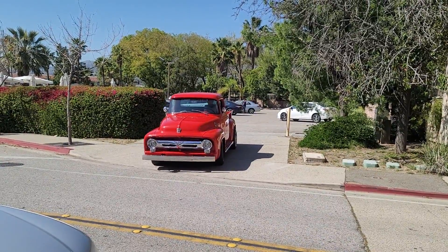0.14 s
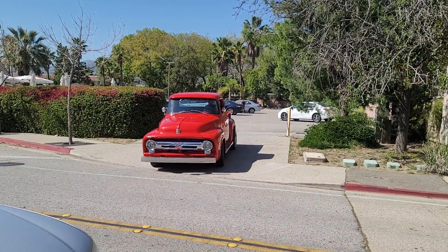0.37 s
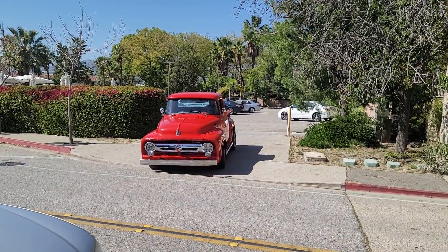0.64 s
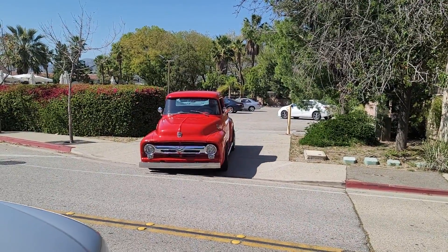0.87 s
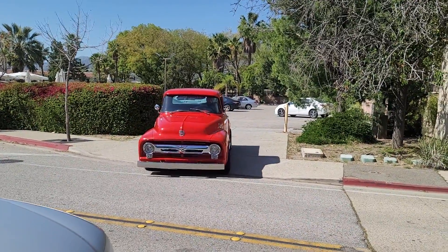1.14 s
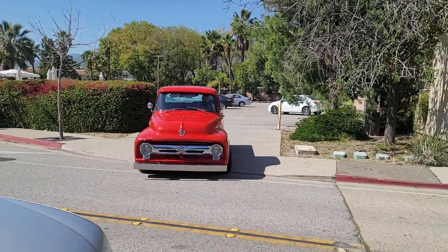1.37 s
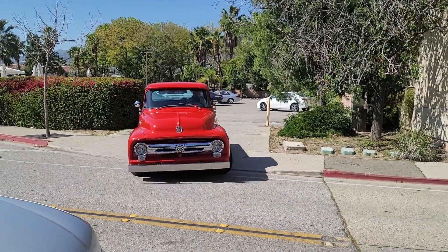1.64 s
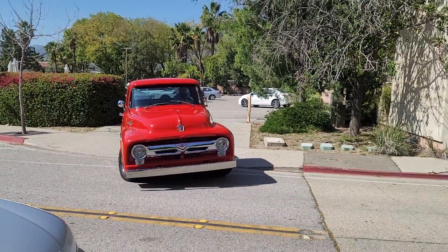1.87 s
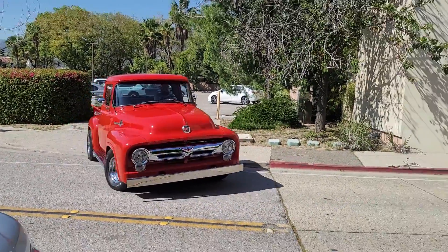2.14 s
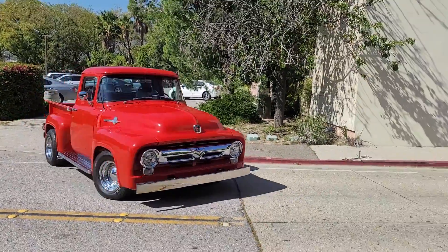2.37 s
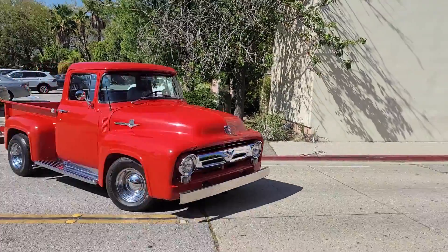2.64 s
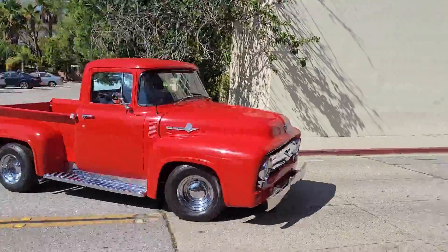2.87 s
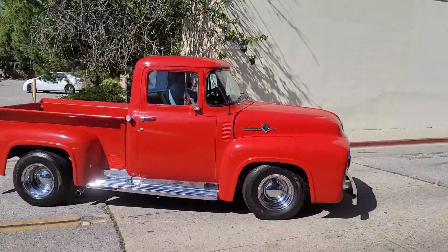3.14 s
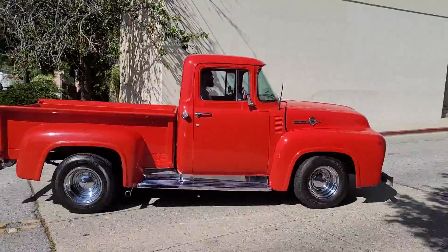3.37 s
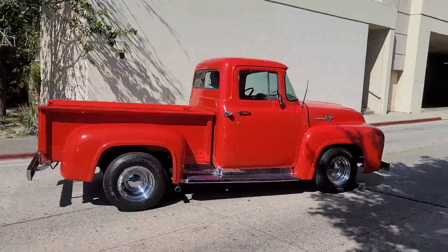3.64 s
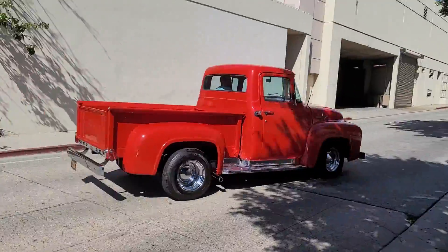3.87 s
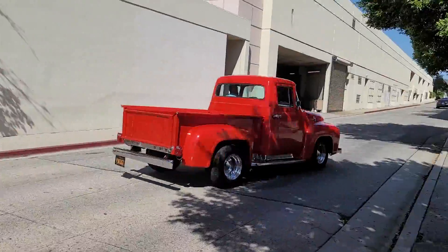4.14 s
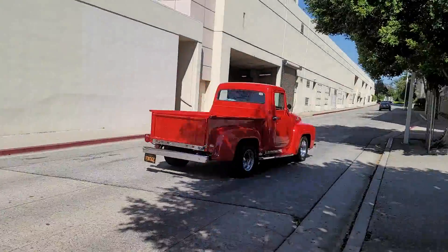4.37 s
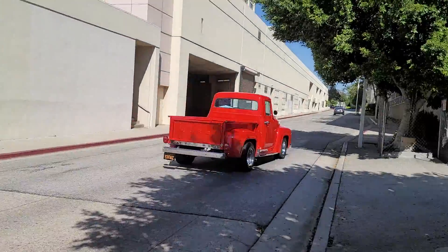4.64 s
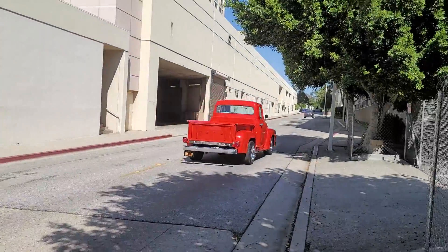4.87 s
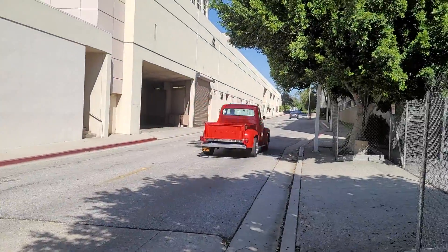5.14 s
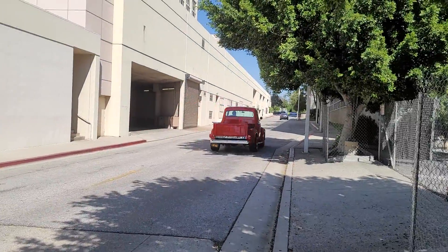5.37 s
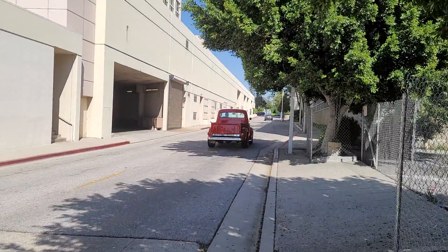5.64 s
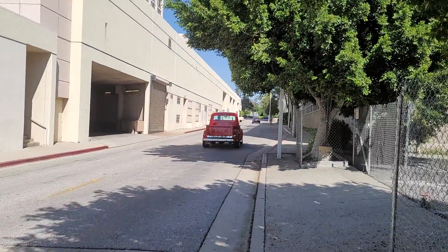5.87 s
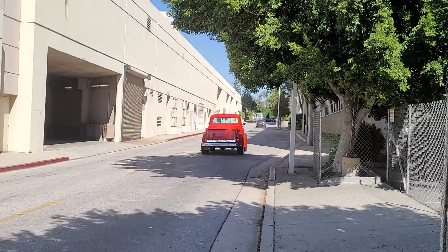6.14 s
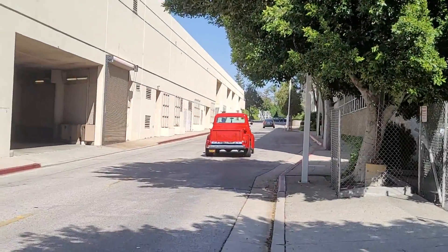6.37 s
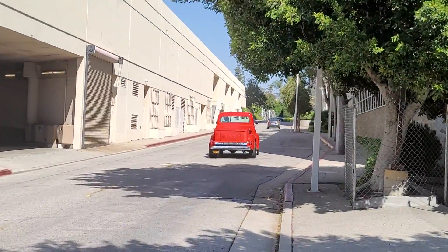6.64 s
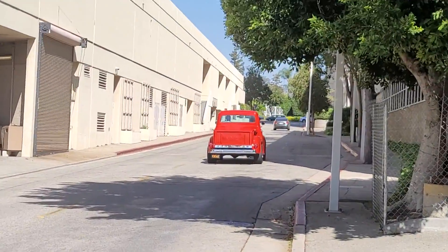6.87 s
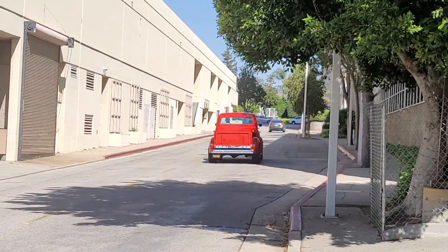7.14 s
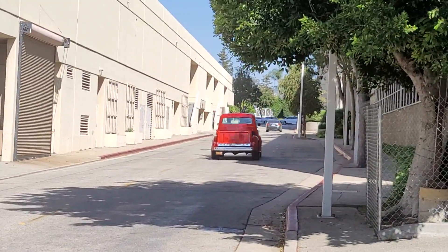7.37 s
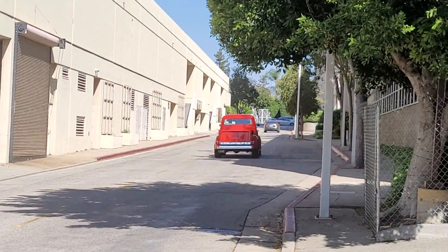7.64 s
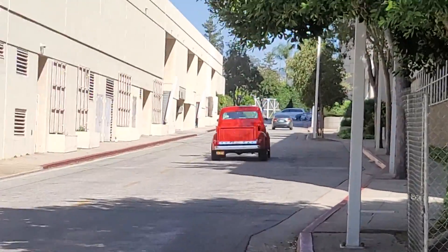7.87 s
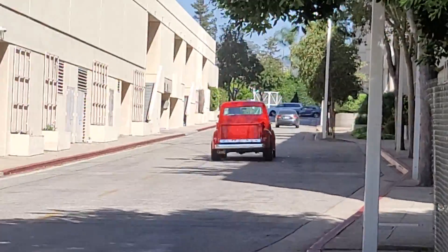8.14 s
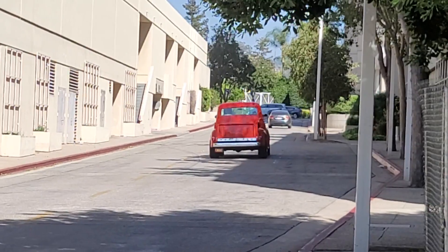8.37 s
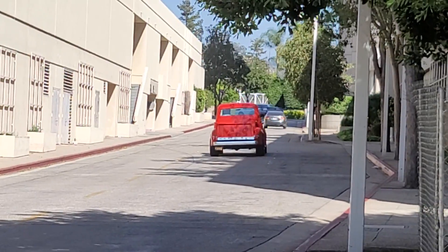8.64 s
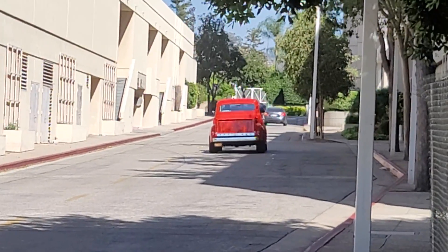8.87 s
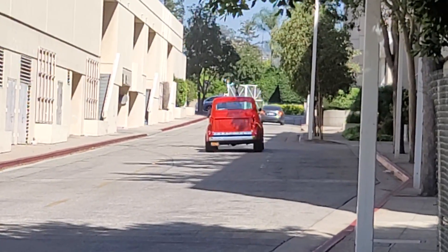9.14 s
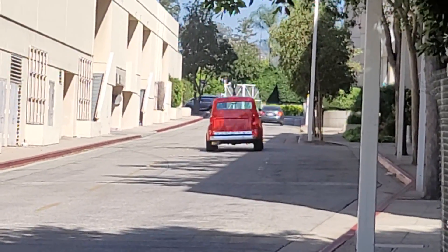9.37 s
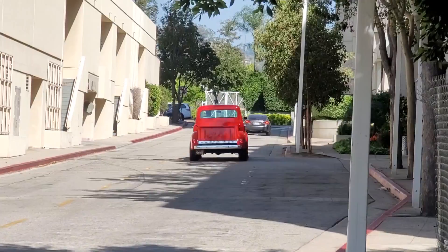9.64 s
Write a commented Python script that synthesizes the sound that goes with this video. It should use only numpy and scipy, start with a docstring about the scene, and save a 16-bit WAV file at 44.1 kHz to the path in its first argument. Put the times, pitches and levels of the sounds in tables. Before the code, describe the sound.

Stereo roadside perspective on an open street beside a long building. At 0 s an old eight-cylinder pickup revs up sharply within 0.3 s, holds a firm throaty roar to about 1 s, then sinks toward a slow, lumpy burble by 2.4 s as it rolls nearer. Dull metallic knocks come at 2.3 and 2.9 s. From 3 to 3.8 s it passes close: rapid ticks of loose tin, bright sheet-metal rattle and airy hiss over uneven low exhaust throbs. Around 4.1 s the tail turns toward the listener, with hollow puffs and a brief thin whine; pitch climbs steadily to 5.7 s. The throttle lifts and pitch drops by 6.3 s, a knock sounds near 6.7, and a second, more distant pull rises to 7.8 s. It lifts again, settling into a soft fading rumble until 9.8 s. Distant traffic, throbbing low machinery drone and faint wall echoes remain.

```python
"""Old eight-cylinder pickup pulling away

The pickup revs, rolls out of a drive, pulls past close by and shifts up twice down a street.
Engine orders are sines locked to one phase; firing pulses ring pipe resonances and gate the noises of
roar, engine bay, tinware and air. Clicks ring loose tin. A low throbbing drone of nearby machinery
and distant traffic noise lie below; delayed copies of the exhaust note return as echoes."""
import sys
import numpy as np
from scipy import signal
from scipy.fft import rfft, irfft, next_fast_len
from scipy.io import wavfile

SR = 44100
rng = np.random.default_rng(int(sys.argv[2]) if len(sys.argv) > 2 else 0)


def magnitude_from_level(level_db):
    """Linear magnitude for a level in decibels (20 dB per decade)."""
    exponent = np.asarray(level_db, float) / 20
    return 10 ** exponent


def dump(signal):
    """Clip the signal to [-1, 1] and save it as 16-bit WAV at the path in sys.argv[1]."""
    limited = np.clip(np.atleast_2d(signal).T, -1, 1)
    pcm = np.round(limited * 32767).astype(np.int16)
    wavfile.write(sys.argv[1], SR, pcm)


N = 430407   # samples

# All levels are relative: source trims and the gain of record() come on top.
# mean engine speed: time_s, cycles_hz
SPEED = [(0.0, 11.5), (0.1, 14.2), (0.2, 17.3), (0.3, 19.0), (0.9, 20.0), (1.0, 19.5), (1.4, 16.5),
         (1.8, 15.96), (2.2, 12.77), (2.4, 11.97), (2.8, 11.71), (3.2, 10.65), (3.4, 11.39), (3.6, 11.88),
         (4.18, 14.75), (4.28, 15.05), (4.36, 16.6), (4.6, 16.89), (4.8, 18.5), (5.4, 21.69), (5.7, 22.9),
         (5.85, 22.3), (6.0, 19.85), (6.2, 17.14), (6.32, 14.2), (6.5, 17.3), (6.7, 16.3), (7.4, 18.51),
         (7.78, 19.15), (8.2, 14.21), (8.4, 13.17), (9.76, 11.27)]
HUNT_SHARE, HUNT_RATE_HZ = .004, 5   # slow chance departures from that mean
MID_SPEED_HZ = 16   # reference for the octaves of speed in LAYERS
# strong exhaust orders: time_s, firing_db, uneven_bank_db, order_11_db, order_13_db
EXHAUST = [(0.03, -32.5, -22.5, -37.5, -45), (0.17, -13.5, -29, -27.5, -39), (0.32, -18.5, -31.5, -32, -42),
           (0.9, -19, -38.5, -34.5, -38.5), (1.2, -19.5, -24, -23.5, -58), (1.6, -13, -25.5, -34, -46),
           (1.9, -20, -21.5, -38.5, -31), (2.4, -25, -13.5, -22, -31.5), (2.8, -25.5, -7.5, -26.5, -29),
           (3, -30.5, -13.5, -29, -23), (3.3, -17.5, -13.5, -21, -21), (3.6, -29.5, -9, -21.5, -39.5),
           (4.2, -29, -10, -34.5, -30), (4.6, -40, -10, -25.5, -48.5), (4.8, -21, -10.5, -30, -39),
           (5.55, -25.5, -11.5, -33, -37.5), (5.75, -29, -12.5, -45.5, -45), (5.95, -36, -16, -53, -36.5),
           (6.35, -36, -36.5, -32, -54), (6.7, -16.5, -16.5, -36, -52), (7.04, -19.5, -31, -48, -36),
           (7.16, -32.5, -23, -46.5, -38.5), (7.65, -25, -31, -41.5, -40.5), (7.85, -40, -26, -52, -58.5),
           (8.3, -40.5, -37, -45, -42.5), (9.76, -40.5, -41.5, -52, -57.5)]
FIRING_ORDER = 8   # orders count periods per engine cycle
# low orders of the uneven banks: order
UNEVEN_ORDERS = [3, 5]
# offset of each of those orders: level_db
UNEVEN_DB = [-5, 0.5]
# higher orders of the uneven banks: order
UPPER_ORDERS = [11, 13]
# tailpipe response to the low uneven orders: frequency_hz, gain_db
TAILPIPE = [(30, -30.5), (41, -22), (48, -10), (58, -1.5), (80, -1.5), (104, -8), (120, -15.5)]
# weaker exhaust orders, re the roar: order, level_db
WEAK_ORDERS = [(4, -6), (6, -10), (7, -7), (9, -6), (10, -5), (12, -10), (14, -9), (15, -6), (16, -2),
               (17, -9), (18, -9), (19, -8)]
WEAK_LIFTED_DB, MUFFLER_HZ = -7, 214   # their change when lifted; corner of their low-pass slope
NEAR_WAVER_DB, FAR_WAVER_DB = .8, 2.0   # unsteadiness of the strong orders
# passing high orders: order, start_s, end_s, level_db
OVERTONES = [(19, 0.37, 1.0, -38), (22, 1.37, 2.0, -38), (24, 1.3, 1.95, -38), (23, 4.08, 4.45, -37),
             (17, 0.4, 1.3, -41), (16, 4.25, 4.9, -36), (13, 4.18, 4.48, -27), (18, 5.0, 5.6, -40)]
OVERTONE_FADE_S = .1
# relative pulse strength, halved in dB when it gates noise: cylinder_db
CYLINDERS_DB = [-2.5, -22, 2, -16.5, -15, 9, -20, 3.5]
LOPE_DB = 5   # peak swing of the puffs once in every engine cycle
# pipe resonances: frequency_hz, level_db, t60_s
PIPE = [(298, -6.5, 0.054), (365.3, -1, 0.084), (429, -7, 0.027), (756, -31, 0.032)]
PULSES_FRONT_DB, PULSES_BEHIND_DB = 0.5, -2   # pipe pulses re the roar
# roar spectrum: frequency_hz, relative_density_db
ROAR = [(20, -30), (35, -14), (76, -10), (176, -15), (240, -20), (368, -13), (600, -32), (900, -80)]
# rush spectrum: frequency_hz, relative_density_db
RUSH = [(260, -22.5), (450, -3), (585, -4.5), (720, -2), (891, -3.5), (1080, -7), (1300, -4.5), (1690, -31),
        (2860, -120)]
# engine-bay spectrum: frequency_hz, relative_density_db
BAY = [(680, -50.5), (1150, -5.5), (1190, -8.5), (1540, -3.5), (2100, -9), (2730, -33), (4620, -120)]
# tinware spectrum from the side: frequency_hz, relative_density_db
TINWARE = [(1700, -32), (2000, -24), (2420, 3), (2660, 2.5), (2890, -4), (3150, -3.5), (3800, -8),
           (4500, -27.5)]
# tinware spectrum from behind: frequency_hz, relative_density_db
TINWARE_TAIL = [(1120, -27), (1900, -15), (2270, -6.5), (2640, 5.5), (3110, -7), (3500, -4.5), (4550, -51),
                (7700, -120)]
# hiss spectrum from the front and side: frequency_hz, relative_density_db
HISS = [(1940, -4.5), (3300, 1), (3880, -5.5), (4750, -2.5), (5320, -2.5), (5840, -4.5), (7500, -23),
        (9750, -53), (16500, -120)]
# hiss spectrum from behind: frequency_hz, relative_density_db
HISS_TAIL = [(1940, -36), (3300, -4.5), (3990, -1.5), (4830, -2.5), (5600, -5.5), (7500, -16.5),
             (9750, -27.5), (16500, -120)]
# air spectrum: frequency_hz, relative_density_db
AIR = [(4120, -29), (7000, 3.5), (7810, -9), (9480, -7), (11500, -1.5), (15100, -5), (15800, -6.5)]
# edges between treble bands that swell independently: edge_hz
PATCH_EDGES_HZ = [2650, 3100, 3600, 4200, 4800, 5500, 6300, 7200, 8500, 10000, 12000, 14000]
PATCH_DB = 2.4
# roar, rush, bay, tinware, hiss, air: base_db, db_per_presence_db, lifted_db, db_per_speed_octave,
# broadside_db, behind_db, down_street_db
LAYERS = [(-27, 0.45, -5, 2, -0.5, 0, -3), (-32, 0.62, -5.5, 1, 0, 3, 4),
          (-31, 0.64, -7.5, 6, -1.5, 0, -12.5), (-37.5, 0.72, -6.5, 4, 10, 0.5, 1),
          (-38, 1.03, -7.5, 1, -0.5, 1, -0.5), (-44, 1.72, -9.5, 1, -2.5, 1, 9)]
# treble level as the truck nears, recedes and sags while the throttle is lifted: time_s, level_db
PRESENCE = [(0, -3), (0.3, -5), (1, -8.5), (2.2, -5.5), (2.7, -2), (3, -1.5), (3.3, 0), (3.8, -1),
            (4.1, -1), (4.4, -1.5), (4.8, -6), (5.56, -9.5), (5.8, -10), (6.3, -17.5), (6.55, -15.5),
            (7.65, -19.5), (9.76, -17.5)]
# throttle lifted: start_s, end_s
LIFTS = [(5.63, 6.46), (7.76, 12.0)]
THROTTLE_S = 0.1   # time to open or shut
BROADSIDE_S, BROADSIDE_WIDTH_S = 3.52, 0.66   # the flank faces the listener
# the tail comes to face the listener: start_s, end_s
TURNS_AWAY_S = [3.93, 4.26]
# the truck recedes down the street: start_s, end_s
DOWN_STREET_S = [5.3, 8.9]
# modes of the tinware: frequency_hz, level_db, t60_s
TIN_MODES = [(2280, -10, .02), (2450, -6, .025), (2890, -4, .028), (3350, -10, .02)]
# ticks of loose tinware, before a random spread: time_s, peak_db
TICKS = [(2.9973, -23), (3.087, -21), (3.1445, -23), (3.2009, -17), (3.2386, -14), (3.2737, -19.5),
         (3.3301, -14), (3.363, -10.5), (3.4162, -16.5), (3.4508, -17.5), (3.471, -11), (3.5017, -16),
         (3.5561, -11.5), (3.5875, -22.5), (3.6514, -19), (3.6716, -22.5), (3.7213, -11), (3.7646, -18),
         (3.7814, -17), (3.7969, -11.5), (3.8279, -15)]
# duller knocks: time_s, peak_db, pitch_hz
KNOCKS = [(2.348, -19, 950), (2.859, -16, 937), (2.897, -12, 1070), (2.992, -18.5, 913), (6.687, -15, 1270),
          (8.43, -20.5, 855)]
CONTACT_HZ = 4930   # ticks and knocks are soft above this
WHINE_ORDER, WHINE_FADE_S, WHINE_DB = 45.8, .15, -40
# whine at full base level: start_s, end_s
WHINE_S = [3.9, 5.5]
# flares added to the whine: middle_s, length_s, level_db
FLARES = [(4.225, .12, -24), (4.4, .12, -31), (4.58, .07, -30), (4.85, .1, -40), (5.33, .25, -42)]
# short narrow swells of noise: middle_s, length_s, center_hz, width_hz, level_db
PUFFS = [(.55, .55, 1540, 220, -37), (3.14, .05, 5200, 1400, -42), (3.36, .14, 6000, 500, -43),
         (3.42, .04, 3100, 500, -33), (3.565, .03, 3350, 300, -31), (3.73, .03, 2450, 400, -28),
         (3.81, .07, 2450, 300, -28), (3.955, .03, 3950, 400, -33), (4.09, .2, 880, 50, -33),
         (4.1, .2, 975, 40, -37), (4.28, .14, 895, 60, -31), (4.45, .12, 880, 60, -34),
         (5.16, .1, 715, 40, -35)]
# machinery drone: time_s, main_hz, main_db, lowest_db, middle_db
DRONE = [(0, 93.7, -32.5, -25.5, -31.5), (2, 94.65, -30.5, -29, -30), (3, 95.5, -28.5, -45, -39.5),
         (5.2, 92.1, -30, -48.5, -39), (5.6, 92.66, -26, -47, -16.5), (6.3, 88.6, -34, -28.5, -22),
         (6.7, 87, -20.5, -39.5, -32.5), (7.1, 90.4, -19.5, -42.5, -32.5), (7.6, 89.9, -28.5, -31, -30),
         (8.7, 88.56, -29, -35, -31), (9.76, 89.4, -30.5, -40, -45.5)]
# its lowest and middle tones: pitch_hz
DRONE_LOW_HZ = [41.3, 59.4]
THROB_S, THROB_TOP_S, THROB_DEPTH = .38, 6.71, .35   # main tone: beat period, one of its tops, depth
# distant traffic spectrum: frequency_hz, relative_density_db
STREET = [(15, -43.5), (25, -21), (80, -0.5), (179, -14), (224, -17), (420, -17), (661, -18), (805, -16.5),
          (1250, -23.5), (2000, -37.5), (3620, -44), (9000, -84), (11700, -102), (19800, -120)]
STREET_DB = -36.5   # before the traffic gain
# distant traffic level, steady at first, then dipping and wavering slightly: time_s, gain_db
TRAFFIC_GAIN = [(5.6, 7.5), (6.3, 4), (7.6, 8.5), (9.0, 6.5), (9.76, 8.5)]
# coherence of the two ports: frequency_hz, common_share
LIKENESS = [(60, .98), (150, 0.98), (300, 0.62), (600, 0.5), (1200, 0.65), (2500, 0.55), (5000, 0.35),
            (8000, 0.45), (12000, 0.85)]
# phase by which the left port leads: frequency_hz, phase_rad
PORT_PHASE = [(0, 0.34), (260, 0.41), (520, 1.8), (860, 1.3), (1210, 2.67), (1640, 1.52), (2070, 3.46),
              (2840, 11.07), (3450, 10.13), (4820, 15.35), (5860, 20), (7060, 19.7), (9040, 19.4),
              (16200, 18)]
# left minus right port: frequency_hz, difference_db
PORT_BALANCE = [(60, -1.4), (150, -.6), (350, -3), (700, 0.6), (2500, 0.1), (5000, -0.5), (9000, 3),
                (15000, 0)]
# echoes of the exhaust note: delay_s, left_db, right_db
ECHOES = [(0.04, -22, -21.5), (.127, -19, -18)]


def rms_one(x):
    """Normalization: scale a signal to unit rms."""
    return x / np.sqrt(np.mean(x ** 2) + 1e-20)


def in_time(rows):
    """Linear interpolation: the columns of a time table at every sample."""
    s, *columns = np.transpose(rows)
    return [np.interp(np.arange(N) / SR, s, c) for c in columns]


def at_hz(points, hz):
    """Logarithmic frequency: spectra are interpolated along a log axis."""
    points = np.array(points)
    return np.interp(np.log(hz + 1), np.log(points[:, 0] + 1), points[:, 1])


def drift(rate_hz):
    """Low-pass random process: two equal poles leave slow fluctuations of unit rms."""
    hop = 40   # samples between slow values
    pole = np.exp(-2 * np.pi * hop * rate_hz / SR)
    white = rng.standard_normal(N // hop + 2002)
    slow = signal.lfilter([1], [1, -2 * pole, pole * pole], white)[2000:]
    return np.interp(np.arange(N) / hop, np.arange(len(slow)), rms_one(slow))


def tone(turns, level_db, waver_db, rate_hz):
    """Modulated sine: one slow fluctuation moves both strength and phase."""
    waver = waver_db * drift(rate_hz)
    phase = 2 * np.pi * (turns + rng.random()) + 0.15 * waver
    return np.sqrt(2) * magnitude_from_level(level_db + waver) * np.sin(phase)


def two_ports(near, spread, colour=((1, 0), (2, 0))):
    """Partial coherence: the right port hears near, phase-shifted, plus a share of spread."""
    margin = 2000
    size = next_fast_len(N + 2 * margin, real=True)
    hz = np.arange(size // 2 + 1) * SR / size
    coarse = np.geomspace(10, SR / 2, 600)
    alike = np.interp(hz, coarse, np.clip(at_hz(LIKENESS, coarse), 0, 1))
    turn = np.exp(-1j * np.interp(hz, *np.transpose(PORT_PHASE)))
    tilt = np.interp(hz, coarse, magnitude_from_level(at_hz(PORT_BALANCE, coarse) / 2))
    gain = np.interp(hz, coarse, magnitude_from_level(at_hz(colour, coarse)))
    padded = np.pad([near, spread], ((0, 0), (margin, margin)), "reflect")
    left, other = rfft(padded, size)
    right = alike * turn * left + np.sqrt(1 - alike ** 2) * other
    return irfft(gain * np.array([left * tilt, right / tilt]), size)[:, margin:N + margin]


def noise(colour, level_db, gate=1, flutter_db=2.0, flutter_rate_hz=10):
    """Filtered noise: gated white noise takes a spectrum, then a slow random flutter."""
    heard = two_ports(*(rng.standard_normal((2, N)) * gate), colour)
    unit = heard / np.sqrt(np.mean(heard.mean(axis=0) ** 2))
    return unit * magnitude_from_level(level_db + flutter_db * drift(flutter_rate_hz))


def ring(clicks, hz, t60_s):
    """Resonance: a unit click sets off a decaying sine of initial height 1."""
    r, w = magnitude_from_level(-60 / (t60_s * SR)), 2 * np.pi * hz / SR
    return signal.lfilter([0, np.sin(w)], [1, -2 * r * np.cos(w), r * r], clicks + 1e-18)


def street():
    """Broadband superposition: distant traffic is one coloured noise under a slow level curve."""
    return noise(STREET, STREET_DB + in_time(TRAFFIC_GAIN)[0], flutter_db=.7)


def drone():
    """Tonal radiation with beating: four low machinery tones, of which the main one throbs."""
    hz, main_db, lowest_db, middle_db = in_time(DRONE)
    s = np.arange(N) / SR
    turns = np.cumsum(hz * (1 + .012 * drift(3))) / SR
    throb = 1 + THROB_DEPTH * np.cos(2 * np.pi * (s - THROB_TOP_S) / THROB_S)
    out = throb * tone(turns, main_db - .5, waver_db=1.5, rate_hz=9)
    out += tone(2 * turns, main_db / 2 - 27, waver_db=4.0, rate_hz=5)
    for low_hz, db in zip(DRONE_LOW_HZ, (lowest_db, middle_db)):
        out += tone(low_hz * s, db - 2, waver_db=2.5, rate_hz=9)
    return out


def wall(x):
    """Reflection: building fronts return late, weaker copies."""
    out = np.zeros((2, N))
    for delay_s, *side_db in ECHOES:
        lag = int(delay_s * SR)
        out[:, lag:] += magnitude_from_level(side_db)[:, None] * x[:N - lag]
    return out


def throttle_lifted():
    """Control ramp: 1 while the pedal is up, 0 while it is down."""
    s = np.arange(N) / SR
    return sum(np.clip(.5 + np.minimum(s - a, b - s) / THROTTLE_S, 0, 1) for a, b in LIFTS)


def layer_levels(cycles_hz, behind):
    """Superposed level changes: presence, throttle, speed, aspect and distance add in dB."""
    s = np.arange(N) / SR
    broadside = np.exp(-((s - BROADSIDE_S) / BROADSIDE_WIDTH_S) ** 4)
    speed_octaves = np.log2(cycles_hz / MID_SPEED_HZ)
    down_street = np.interp(s, DOWN_STREET_S, [0, 1])
    controls = [np.ones(N), in_time(PRESENCE)[0], throttle_lifted(), speed_octaves, broadside,
                behind, down_street]
    return np.array(LAYERS) @ controls


def firing_gate(turns, depth):
    """Pulsed flow: eight decaying puffs a cycle, uneven between cylinders and firings."""
    firing = 8 * turns
    count = firing.astype(int)
    lope_db = LOPE_DB * np.cos(2 * np.pi * turns)
    cylinder_db = .5 * np.array(CYLINDERS_DB)[count % 8]
    chance_db = 3.0 * rng.standard_normal(4000)[count]
    return 1 + depth * magnitude_from_level(lope_db + cylinder_db + chance_db) * np.exp(-3.0 * (firing - count))


def air(turns, level_db):
    """Turbulence noise: the highest band of air, lightly pulsed by the firings."""
    return noise(AIR, level_db, firing_gate(turns, depth=.2), flutter_db=.4, flutter_rate_hz=18)


def hiss(turns, level_db, behind):
    """Power crossfade: steady front hiss yields to pulsed hiss from behind."""
    front = noise(HISS, level_db, flutter_db=.5, flutter_rate_hz=16)
    gate = firing_gate(turns, depth=.4)
    tail = noise(HISS_TAIL, level_db, gate, flutter_db=.5, flutter_rate_hz=16)
    return np.sqrt(1 - behind) * front + np.sqrt(behind) * tail


def tinware(turns, level_db, behind):
    """Forced vibration: firing-gated tin noise crossfades in power from side to tail."""
    side = noise(TINWARE, level_db - 4.0, firing_gate(turns, depth=0.9), flutter_db=.8)
    tail = noise(TINWARE_TAIL, level_db - .6, firing_gate(turns, depth=0.33), flutter_db=0.2)
    return np.sqrt(1 - behind) * side + np.sqrt(behind) * tail


def patchy(x):
    """Independent band modulation: treble bands swell and sink each on their own."""
    out = 0
    for edge_hz in PATCH_EDGES_HZ:
        low = signal.sosfiltfilt(signal.butter(2, edge_hz, fs=SR, output="sos"), x)
        out = out + low * magnitude_from_level(PATCH_DB * drift(17.3))
        x = x - low
    return out + x


def puffs():
    """Band-pass noise: short narrow swells sound hollow or sharp by their frequency."""
    s, out = np.arange(N) / SR, np.zeros(N)
    for at, length, hz, width_hz, db in PUFFS:
        near = slice(int((at - length) * SR), int((at + length) * SR))
        edges_hz = [hz - width_hz / 2, hz + width_hz / 2]
        band = signal.butter(2, edges_hz, "band", fs=SR, output="sos")
        filtered = signal.sosfilt(band, rng.standard_normal(2 * SR))
        swell = np.exp(-(2 * (s[near] - at) / length) ** 4)
        out[near] += magnitude_from_level(db) * swell * rms_one(filtered[-len(s[near]):])
    return out


def knocks():
    """Damped resonance: each dull ring falls 60 dB within sixty periods."""
    out = np.zeros(N)
    for s, db, hz in KNOCKS:
        click = np.zeros(SR // 10)
        click[0] = magnitude_from_level(db)
        at = round(s * SR)
        out[at:at + len(click)] += ring(click, hz, 60.0 / hz)
    return out


def ticks(tin_db):
    """Modal excitation: loud ticks and a random patter strike each tin mode unequally."""
    at, out = [round(s * SR) for s, db in TICKS], np.zeros(N)
    strength_db = tin_db + 4 + 5.1 * np.minimum(rng.exponential(1, N), 1.8)
    patter = (rng.random(N) < 90 / SR) * magnitude_from_level(strength_db)   # about 90 candidates per s
    for hz, level_db, t60_s in TIN_MODES:
        clicks = patter * (rng.random(N) < .6)   # a mode answers 60 % of them
        clicks[at] = magnitude_from_level(np.array(TICKS)[:, 1] + rng.normal(0, 2.5, len(at)))
        out += magnitude_from_level(level_db) * ring(clicks, hz, t60_s)
    return out


def whine(turns):
    """Order locking: a thin tone follows engine speed through one long span and short flares."""
    s = np.arange(N) / SR
    start_s, end_s = WHINE_S
    fade = np.clip(np.minimum(s - start_s, end_s - s) / WHINE_FADE_S + 1, 0, 1)
    gain = magnitude_from_level(WHINE_DB) * fade
    gain += sum(magnitude_from_level(db) * np.exp(-(2 * (s - at) / length) ** 4) for at, length, db in FLARES)
    return gain * tone(WHINE_ORDER * turns, 0, waver_db=1.3, rate_hz=12)


def engine_bay(turns, level_db):
    """Pulsed broadband radiation: the engine bay clatters with the firings."""
    return noise(BAY, level_db - .8, firing_gate(turns, depth=0.23), flutter_db=1.5)


def exhaust_rush(turns, level_db):
    """Flow noise: a middle band of rushing gas follows the firings."""
    return noise(RUSH, level_db - 0.5, firing_gate(turns, depth=0.32), flutter_db=.8)


def exhaust_roar(turns, level_db):
    """Flow noise: a low pipe roar is deeply pulsed by the firings."""
    return noise(ROAR, level_db - 4, firing_gate(turns, depth=0.7), flutter_db=1.0)


def pipe_pulses(turns, roar_db):
    """Impulse excitation: every firing rings the pipe resonances with its cylinder's strength."""
    count = (8 * turns).astype(int)
    fired = np.diff(count, prepend=0) > 0
    clicks = fired * magnitude_from_level(np.array(CYLINDERS_DB)[count % 8] + rng.standard_normal(4000)[count])
    far_bank = np.isin(count % 8, [1, 4, 6, 7])
    late = np.roll(clicks * far_bank, round(0.0018 * SR))   # the far bank has the longer pipe
    clicks = clicks * ~far_bank + late
    rings = sum(magnitude_from_level(db) * ring(clicks, hz, t60_s) for hz, db, t60_s in PIPE)
    steep = signal.butter(4, 230, "high", fs=SR, output="sos")
    return magnitude_from_level(roar_db - 3.5) * rms_one(signal.sosfilt(steep, rings))


def overtones(turns):
    """Swept resonance: high orders sing while the speed carries them through a pipe resonance."""
    s, out = np.arange(N) / SR, np.zeros(N)
    for order, start_s, end_s, db in OVERTONES:
        fade = np.clip(np.minimum(s - start_s, end_s - s) / OVERTONE_FADE_S + .5, 0, 1)
        out += fade * tone(order * turns, db, waver_db=2.0, rate_hz=6.7)
    return out


def exhaust_note(turns, cycles_hz, roar_db):
    """Harmonic synthesis: strong engine orders, and weak ones that a low-pass slope muffles."""
    firing_db, uneven_db, *upper_db = in_time(EXHAUST)   # orders 11 and 13 have a curve each
    low_db = [uneven_db + db + at_hz(TAILPIPE, order * cycles_hz)
              for order, db in zip(UNEVEN_ORDERS, UNEVEN_DB)]
    strong = zip([FIRING_ORDER] + UNEVEN_ORDERS + UPPER_ORDERS, [firing_db] + low_db + upper_db)
    unsteady_db = np.interp(np.arange(N) / SR, DOWN_STREET_S, [NEAR_WAVER_DB, FAR_WAVER_DB])
    out = sum(tone(order * turns, db, waver_db=unsteady_db, rate_hz=9) for order, db in strong)
    weak_db = roar_db + .5 + WEAK_LIFTED_DB * throttle_lifted()
    for order, db in WEAK_ORDERS:
        muffled_db = -10 * np.log10(1 + (order * cycles_hz / MUFFLER_HZ) ** 5.4)
        out += tone(order * turns, weak_db + db + muffled_db, waver_db=1.8, rate_hz=2.5)
    return out


def scene():
    """Superposition: truck, drone and street add at two receiving ports."""
    cycles_hz, = in_time(SPEED)
    turns = np.cumsum(cycles_hz * (1 + HUNT_SHARE * drift(HUNT_RATE_HZ))) / SR
    behind = np.interp(np.arange(N) / SR, TURNS_AWAY_S, [0, 1])   # 0 front and side, 1 tail
    roar_db, rush_db, bay_db, tin_db, hiss_db, air_db = layer_levels(cycles_hz, behind)
    pulses_db = roar_db + PULSES_FRONT_DB * (1 - behind) + PULSES_BEHIND_DB * behind
    note = exhaust_note(turns, cycles_hz, roar_db) + overtones(turns) + pipe_pulses(turns, pulses_db)
    soft = signal.butter(4, CONTACT_HZ, fs=SR, output="sos")
    contacts = signal.sosfilt(soft, (1 - behind) * ticks(tin_db) + knocks())
    truck = note + contacts + whine(turns) + puffs()
    spread = 0.33 * np.pad(truck, (900, 0), "reflect")[:N]   # a late copy widens the image
    tones = two_ports(truck + drone(), spread) + wall(note)
    treble = tinware(turns, tin_db, behind) + hiss(turns, hiss_db, behind) + air(turns, air_db)
    flow = exhaust_roar(turns, roar_db) + exhaust_rush(turns, rush_db)
    return street() + patchy(treble) + engine_bay(turns, bay_db) + flow + tones


def top_cut(x):
    """Nothing passes above the cut-off."""
    return signal.sosfilt(signal.butter(12, 16580, fs=SR, output="sos"), x)


def record(dry):
    """Saturation and low-pass filtering: a 3 ms end fade, rounded peaks, then a cut top."""
    faded = dry * np.clip((N - np.arange(N)) / (.003 * SR), 0, 1)
    rounded = 1.577 * np.tanh(faded / 1.427)
    cut = signal.cheby2(16, 40, 15900, fs=SR, output="sos")
    return top_cut(signal.sosfilt(cut, rounded))


dry = scene()
out = record(dry)
dump(out)
```